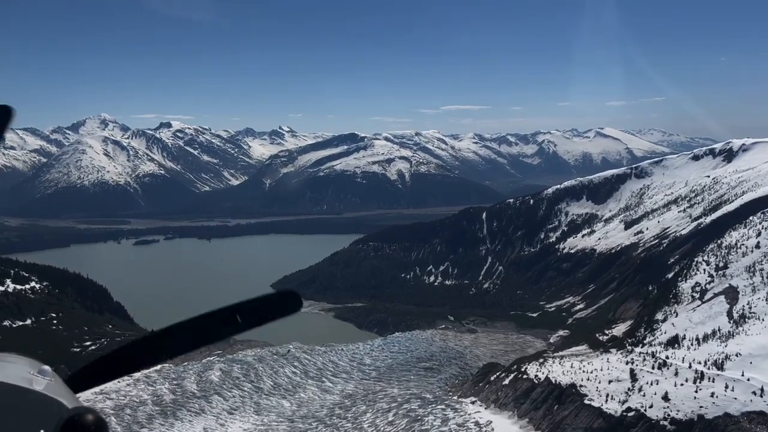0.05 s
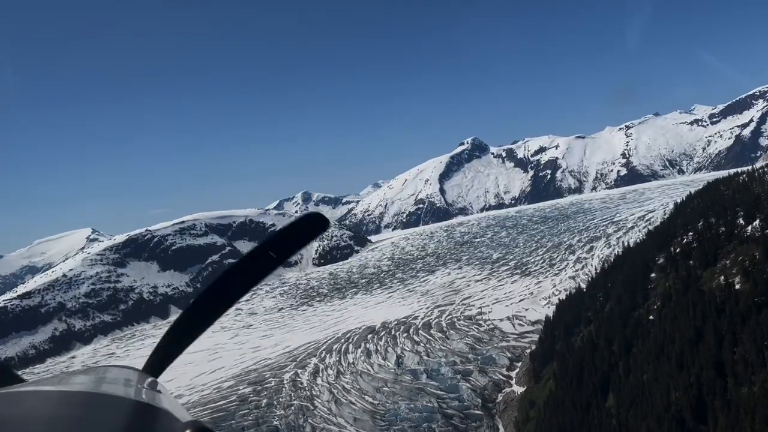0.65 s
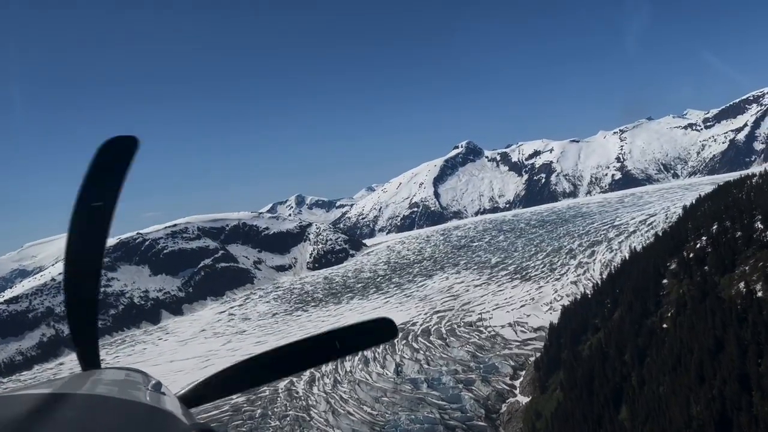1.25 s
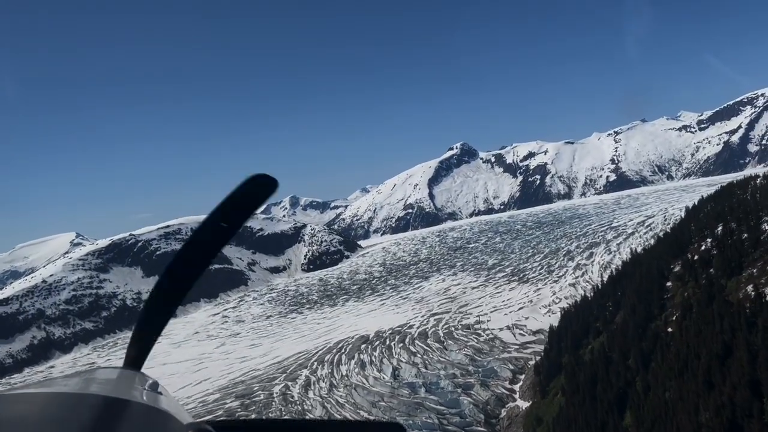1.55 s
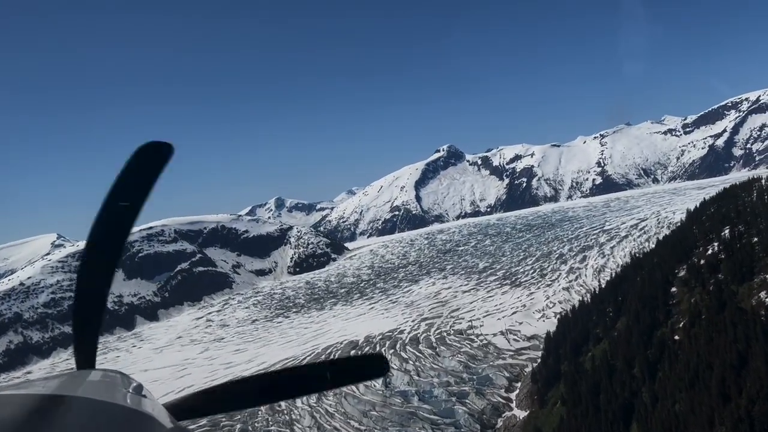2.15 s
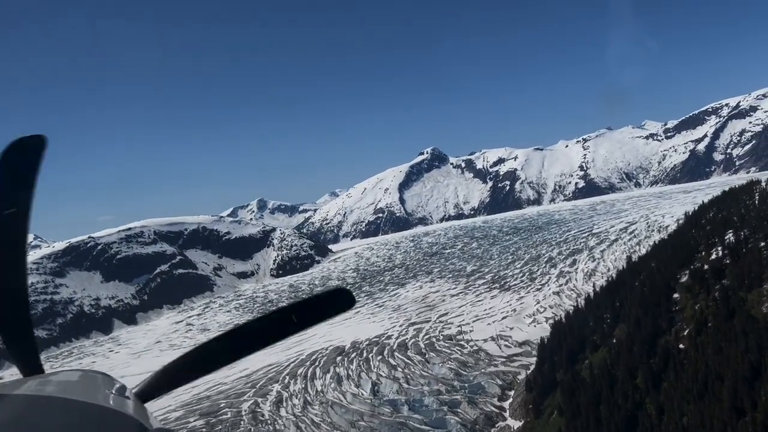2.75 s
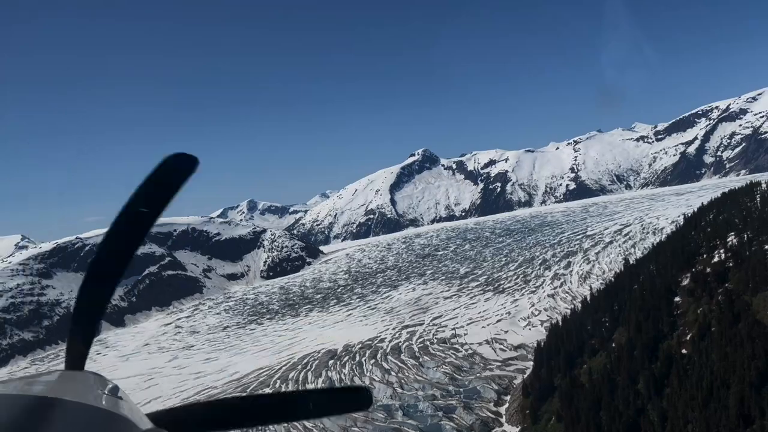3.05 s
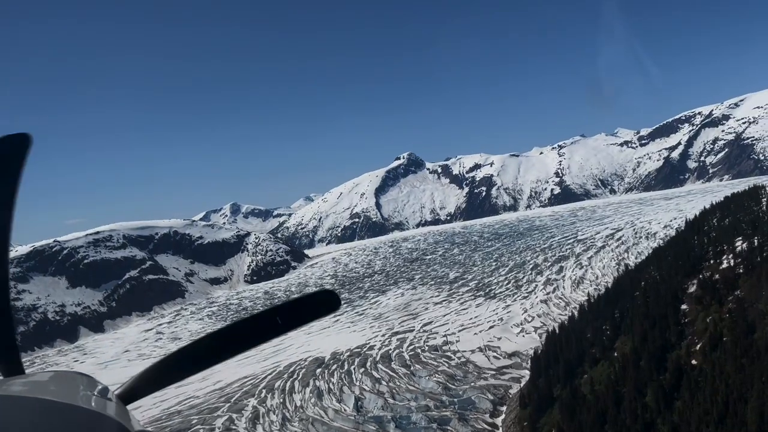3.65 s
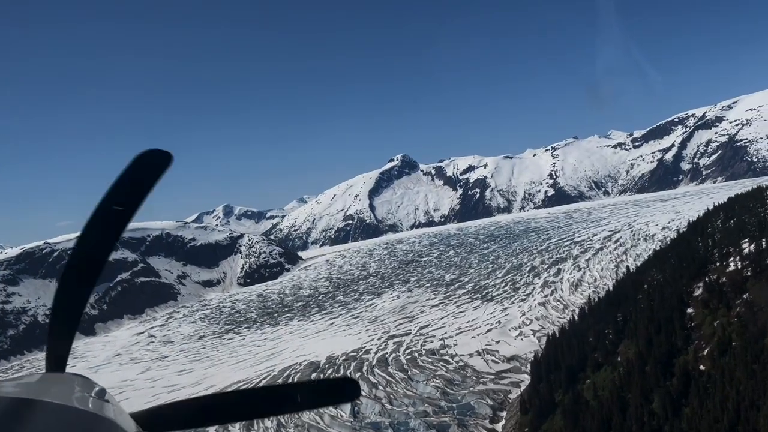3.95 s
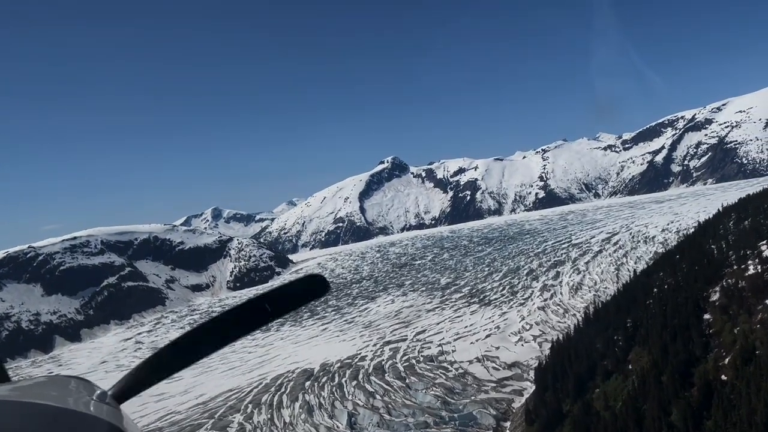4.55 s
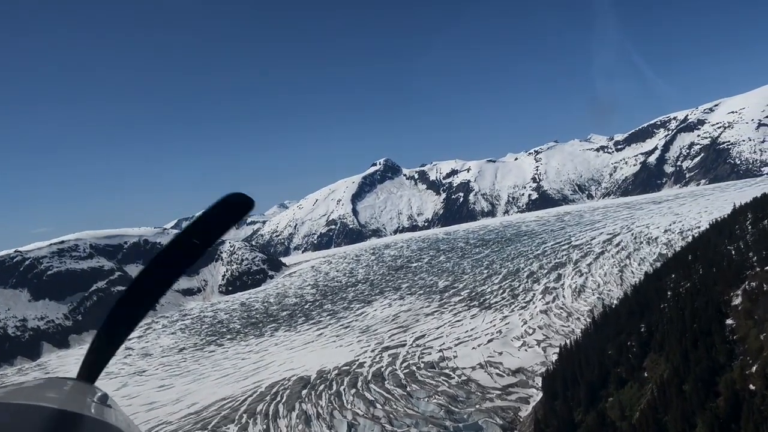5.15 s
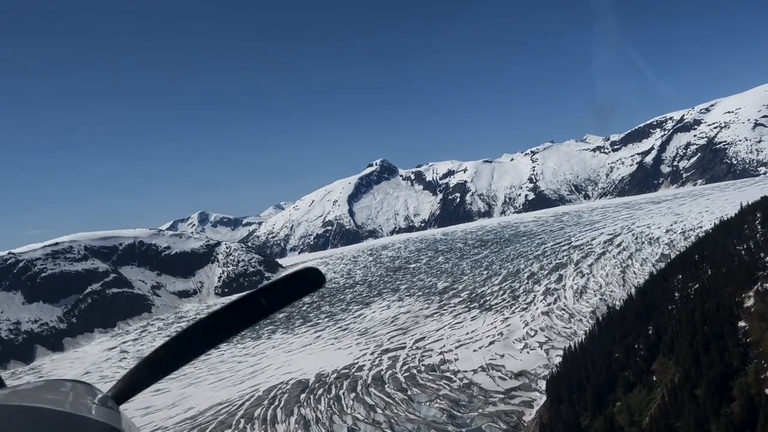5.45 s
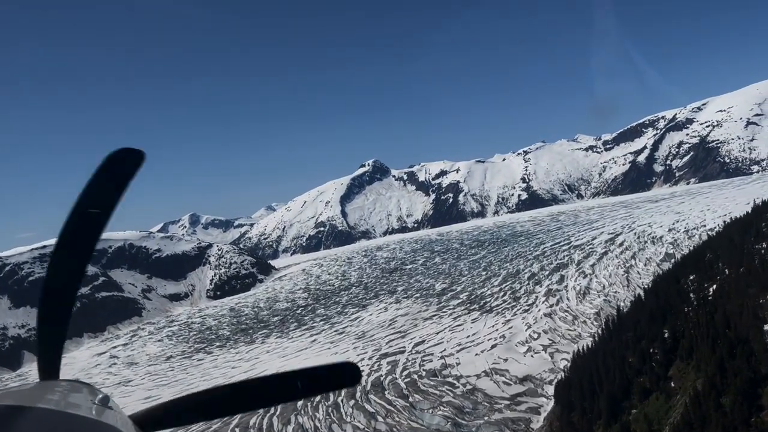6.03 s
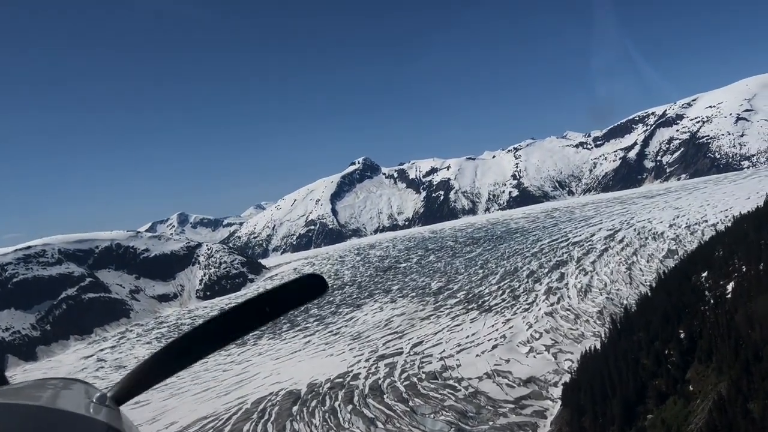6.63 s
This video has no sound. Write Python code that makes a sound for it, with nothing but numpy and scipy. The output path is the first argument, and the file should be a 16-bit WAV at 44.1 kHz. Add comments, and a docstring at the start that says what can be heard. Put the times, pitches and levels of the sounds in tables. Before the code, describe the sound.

Inside the cabin of a small propeller plane in level flight, air roars against the fuselage over a low propeller drone, steady gear tones and a thin turbine whine. The sound starts quietly, breaks off for an instant and swells back much louder. It then slowly dulls and fades, the hiss first and the low air last, until soft single buffets stand out. The stereo microphones are surrounded by it.

```python
"""Turboprop cabin in level flight

A stereo pair of microphones inside a small plane. Air beats on the fuselage all around in a lumpy roar and
rings the cabin's resonances; through it come the propeller's drone, gear tones and a thin turbine whine.
After a quiet start the sound breaks off and swells back much louder; then it slowly dulls and fades,
the hiss first and the low air last, until single buffets stand out."""
import sys
import numpy as np
from scipy import signal
from scipy.fft import rfft, irfft, next_fast_len
from scipy.io import wavfile
from scipy.ndimage import uniform_filter1d

SR = 44100
rng = np.random.default_rng(int(sys.argv[2]) if len(sys.argv) > 2 else 0)


def dump_mix(stems):
    """Bounce the given channels to the path in sys.argv[1] as a 16-bit WAV at rate SR."""
    frames = np.atleast_2d(stems).T  # one column per channel
    limited = np.clip(frames, -1, 1)  # hard clip at full scale
    pcm = np.round(limited * 32767).astype(np.int16)
    wavfile.write(sys.argv[1], SR, pcm)


N = 299439
TIME = np.arange(N) / SR
FFT_SIZE = next_fast_len(N, True)
HZ = np.maximum(np.fft.rfftfreq(FFT_SIZE, 1 / SR), 1)

# the cabin's sound field at the microphones: frequency_hz, likeness (0-1), left_lead_rad, balance_db (L-R)
CABIN_FIELD = [(60, 0.97, -0.1, 0.5), (300, 0.93, -0.4, -0.7), (520, 0.78, -0.6, -2.9),
               (700, 0.35, -2.2, -1.4), (820, 0.21, -3.2, -0.8), (1100, 0.13, -5.2, -4.7),
               (1500, 0.65, -3.2, -3.6), (2100, 0.29, -0.4, -3.7), (2700, 0.32, 1.1, -3.2),
               (3300, 0.32, 2.8, -0.5), (3750, 0.33, 0.4, -0.6), (4800, 0.39, 0.8, 1.4),
               (5700, 0.2, -1.9, -3.8), (6700, 0.71, -0.1, -1.8), (8400, 0.51, -1.2, 0.0),
               (11500, 0.8, 1.9, -0.0), (13000, 0.9, 0.1, -0.1)]
# each layer's course, by name: quiet_db, full_db, swell_s, hold_until_s, first_fade_db_per_s, settle_s
ENVELOPES = {"hiss": (-68.8, -50.9, .014, 1.45, 9.8, 1.53), "turbine": (-74, -52.3, .014, 1.55, 11.3, 1.84),
             "whine": (-81, -50.2, .014, 1.6, 11.5, 1.8), "draught": (-62, -48, .015, 2.25, 6.1, 2.8),
             "slipstream": (-53.8, -38.1, .017, 2.8, 5.6, 4), "whistle": (-74, -55.2, .017, 3.15, 9, 1.95),
             "howl": (-49.2, -33.4, .02, 4.9, 6.3, 9), "gears": (-56, -33, .025, 4.55, 5.1, 9),
             "moan": (-45.8, -31, .021, 5.1, 5, 9), "boom": (-44.4, -26.8, .018, 4.65, 6.9, 9),
             "roar": (-42.4, -24.1, .018, 4.15, 6.6, 8), "drone": (-61, -29.3, .023, 4, 7.4, 6)}

# spectra of the hiss below and above a gap near 10 kHz, the slipstream and roar: frequency_hz, relative_db
LOWER_HISS_SPECTRUM = [(3600, -21), (4400, 4.5), (5000, 2), (5600, -1.5), (6100, 3), (7000, 0.5),
                       (8200, 0.9), (9000, -7), (10000, -44)]
UPPER_HISS_SPECTRUM = [(10500, -53), (11200, 3), (11800, 3), (12600, 2.5), (13300, 1), (14000, 0),
                       (15000, -5), (16500, -35.5)]
SLIPSTREAM_SPECTRUM = [(820, -12), (920, 5.5), (1020, -1.5), (1200, -3.8), (1500, -6.4), (1800, -10.5),
                       (2100, -10.5), (2650, -19), (3100, -19), (4400, -28.5), (5200, -28.5), (6200, -49.5)]
ROAR_SPECTRUM = [(20, -50), (38, -49), (52, -22.5), (70, -15.8), (88, -7.6), (135, -1), (170, -3.8),
                 (222, -.3), (260, -1.6), (320, -9), (420, -34)]
# resonances of the window panels, a draught and its whistle: pitch_hz, half_width_hz, relative_db
PANEL_MODES = [(1080, 24, 0), (1427, 33, -4), (1610, 45, -5.5), (1740, 29, -8.5)]
DRAUGHT_MODES = [(2430, 210, 0), (2720, 200, 0.5), (3330, 360, -5.5), (3820, 380, -7.5), (4370, 200, -8.5)]
WHISTLE_MODES = [(3760, 190, 1), (4000, 130, -2), (4180, 150, -6)]
# resonances of the cabin's air, low to high: pitch_hz, half_width_hz, relative_db
BOOM_MODES = [(308.4, 48, -1), (338.6, 44, -1.5), (393, 31, -4), (438, 39, -6)]
MOAN_MODES = [(475, 38, -7.5), (517, 46, -1.3), (556, 24, -8.5), (605, 40, -9.5)]
HOWL_MODES = [(625, 42, -3.5), (692.6, 24, 0.5), (738, 24, 0), (785, 30, -10), (833, 39, -4),
              (872, 40, -9.5)]

# brief rushes in the slipstream, and gusts and lulls in the low air: centre_s, swell_db, half_length_s
RUSHES = [(3.59, 2.5, .06), (4.65, 1.5, .04)]
GUSTS = [(1.12, 1.2, .06), (1.26, -1.5, .06), (1.97, 1, .06), (2.6, -1.2, .12), (3.79, -3, .03),
         (4.14, 1.7, .06), (4.29, -1.7, .05), (4.4, 1.5, .035), (4.5, -3.5, .05), (4.8, -1.3, .14),
         (5.0, -1.8, .07), (5.18, -2, .04), (5.3, 2.2, .08), (5.412, -4, .018), (5.525, -4, .035),
         (5.76, 2.5, .08), (5.925, -3, .025), (6.05, -4, .05), (6.16, 2, .035), (6.39, 3.5, .025),
         (6.53, -2, .06)]
# throbs of a low cabin resonance: centre_s, level_db, half_length_s
THROBS = [(1.03, -30, .1), (1.68, -27, .13), (2.07, -29, .07), (3.42, -26.5, .17), (4.1, -23.5, .12)]
# single buffets on the fuselage: centre_s, level_db, pitch_hz, half_length_s
BUFFETS = [(1.056, -13, 300, .003), (1.082, -15, 260, .002), (1.598, -13, 300, .002),
           (1.607, -15, 170, .006), (1.614, -14, 280, .002), (3.360, -14, 290, .003),
           (3.915, -15, 240, .003), (4.030, -14, 290, .002), (4.167, -12, 210, .007),
           (4.379, -14.5, 286, .002), (4.396, -12, 275, .003), (4.583, -11.5, 235, .0035),
           (4.757, -19, 170, .006), (4.882, -16, 350, .002), (4.968, -18.5, 220, .006),
           (5.040, -19, 400, .0015), (5.066, -17, 320, .002), (5.078, -16, 300, .002),
           (5.138, -17, 340, .002), (5.235, -13, 300, .0025), (5.303, -13, 326, .0013),
           (5.333, -17, 415, .0017), (5.364, -14.5, 275, .0035), (5.404, -21, 170, .004),
           (5.45, -21, 300, .006), (5.467, -15, 325, .0024), (5.571, -12, 300, .002),
           (5.707, -18, 350, .002), (5.738, -18, 340, .004), (5.808, -20, 220, .003),
           (5.823, -17.5, 415, .0016), (5.893, -20, 320, .0016), (5.968, -18, 350, .0045),
           (6.120, -24, 275, .004), (6.150, -19.5, 280, .004), (6.184, -19.5, 330, .0026),
           (6.279, -21, 320, .005), (6.377, -20, 445, .0015), (6.395, -16.5, 325, .003),
           (6.402, -24, 500, .005), (6.633, -24, 410, .0017)]

# compressor tones: pitch_hz, relative_db
WHINE_TONES = [(11377, -15), (11478, -16), (11586, -20.5), (11683, -23), (12702, -21), (13721, -17),
               (13820, -17)]
# the engine sags slightly and picks up again: time_s, share_of_usual_speed
ENGINE_SPEED = [(.4, 1), (1.1, .9987), (2.5, .9992), (3.6, 1.0012), (6.7, 1.0004)]
# gearbox tones: pitch_hz, relative_db, left_lead_rad, balance_db, flutter_db, sink_db_per_s
GEAR_TONES = [(374, -10.5, -.4, -2, 2.5, 0), (521, -8.5, -.6, -3, 3.2, 0), (670, 0, .19, -4.4, .8, 0),
              (874.3, -8.6, 0, -3.7, 2, .9)]
# tones of the four-bladed propeller: multiple_of_shaft_rate, relative_db
PROPELLER_ORDERS = [(4, -1), (5, -13.5), (6, -8), (7, -25), (8, -10), (9, -15.5), (11, -13.5)]


def from_db(db):
    """Decibels to gain."""
    return 10 ** (np.asarray(db) / 20)


def unit_mid(pair):
    """Scale a stereo pair so that its middle has rms 1."""
    return pair / np.std(pair.mean(0))


def at_hz(rows, hz):
    """Each column of a table at these frequencies."""
    points, *columns = np.transpose(rows)
    return [np.interp(np.log(hz), np.log(points), column) for column in columns]


def bump(centre_s, half_s):
    """A smooth rise to 1 and back."""
    return np.exp(-np.minimum(((TIME - centre_s) / half_s) ** 2, 30))


def swells_db(rows):
    """How far the air swells and slackens."""
    return sum(db * bump(centre_s, half_s) for centre_s, db, half_s in rows)


def drift(rate_hz):
    """A smooth random curve that changes about rate_hz times a second; spread 1."""
    slow = irfft(rfft(rng.standard_normal(FFT_SIZE)) / (1 + (HZ / rate_hz) ** 4), FFT_SIZE)[:N]
    return slow / np.std(slow)


def faded_db(layer):
    """How far a layer has sunk from its full level: not at all while it holds, then fast, then settling."""
    *_, hold_until_s, db_per_s, settle_s = ENVELOPES[layer]
    fading_s = np.maximum(TIME - hold_until_s, 0)
    return db_per_s * settle_s * (1 - np.exp(-fading_s / settle_s))


def level(layer, break_s=.353, return_s=.361, depth_db=34):
    """Gain of a layer: quiet start, break, quick swell, hold and fade."""
    quiet_db, full_db, swell_s, *_ = ENVELOPES[layer]
    dip_db = depth_db * np.exp(-np.maximum(TIME - return_s, 0) / swell_s)
    course_db = np.where(TIME < break_s, quiet_db, full_db - dip_db - faded_db(layer))
    return from_db(uniform_filter1d(course_db, 128))


def outline(spectrum):
    """Gain per frequency of a spectrum, silent beyond its ends."""
    return from_db(at_hz(spectrum, HZ)[0]) * (HZ > spectrum[0][0]) * (HZ < spectrum[-1][0])


def resonances(modes):
    """Gain per frequency of steep-sided resonances that add in power."""
    return np.sqrt(sum(from_db(db) ** 2 / (1 + ((HZ - hz) / width) ** 2) ** 2 for hz, width, db in modes))


def turbulence(colour):
    """Coloured noise: alike at both microphones in the bass, more diffuse higher up."""
    likeness, lead, balance_db = at_hz(CABIN_FIELD, HZ)
    likeness = np.clip(likeness, 0, .995)
    left, unrelated = rfft(rng.standard_normal((2, FFT_SIZE)))
    right = likeness * np.exp(-1j * lead) * left + np.sqrt(1 - likeness ** 2) * unrelated
    pair = np.array([left * from_db(balance_db / 2), right * from_db(-balance_db / 2)])
    return unit_mid(irfft(pair * colour, FFT_SIZE)[:, :N])


def swirl(sound, spread_db, skew=0, size=1024):
    """Narrow bands swell and sink at random for hundredths of a second; with skew, a few flare up."""
    _, frame_s, patches = signal.stft(sound, SR, nperseg=size)
    chance = rng.standard_normal(patches.shape[1:])
    chance = uniform_filter1d(chance, size=3, axis=0)   # across frequency
    chance = uniform_filter1d(chance, size=5, axis=1)   # across time
    chance = np.clip(chance / chance.std(), -3, 3)
    frame_spread_db = np.interp(frame_s, TIME, spread_db * np.ones(N))
    gain = from_db(frame_spread_db * (chance + skew * chance ** 2))
    mean_power = uniform_filter1d(np.mean(gain ** 2, axis=0), size=15)
    gain = gain / np.sqrt(mean_power)
    return signal.istft(patches * gain, SR, nperseg=size)[1][:, :N]


def wandering_clock(wander, rate_hz, speed=1):
    """Time that runs slightly fast and slow, as a governed shaft does; wander is a share of the speed."""
    return np.cumsum(speed + wander * drift(rate_hz)) / SR


def tone(hz, clock, lead_rad, balance_db, flutter_db, flutter_hz):
    """A fluttering sine that follows a clock, with its own phase and level at each microphone."""
    sides = np.array([[.5], [-.5]])
    phase = 2 * np.pi * (hz * clock + rng.random()) + lead_rad * sides
    gain = from_db(balance_db * sides + flutter_db * drift(flutter_hz))
    return unit_mid(np.sin(phase) * gain)


def upper_hiss():
    """The top of the hiss, above a gap near 10 kHz."""
    return level("turbine") * turbulence(outline(UPPER_HISS_SPECTRUM)) * from_db(.98 * drift(24))


def turbine_whine():
    """Two clusters of compressor tones, spaced by the propeller's blade rate, and a lone tone between."""
    clock = wandering_clock(wander=.0005, rate_hz=12)
    whine = 0
    for hz, db in WHINE_TONES:
        _, lead_rad, balance_db = at_hz(CABIN_FIELD, hz)
        whine += from_db(db) * tone(hz, clock, lead_rad, balance_db, flutter_db=1.5, flutter_hz=16)
    return whine


def treble():
    """Faint high hiss and whine; brief random patches of treble flicker as they fade."""
    lower_hiss = level("hiss") * from_db(.9 * drift(20)) * turbulence(outline(LOWER_HISS_SPECTRUM))
    highs = lower_hiss + upper_hiss() + level("whine") * turbine_whine()
    flicker_db = 3.4 * bump(centre_s=2.65, half_s=1.0)
    return swirl(highs, flicker_db, skew=.09, size=512)


def high_air():
    """The slipstream just outside the window panels, and a draught with a breathy whistle in it."""
    panels = np.hypot(outline(SLIPSTREAM_SPECTRUM), resonances(PANEL_MODES))
    rush_db = .54 * drift(15) + swells_db(RUSHES)
    slipstream = level("slipstream") * from_db(rush_db) * turbulence(panels)
    draught = level("draught") * turbulence(resonances(DRAUGHT_MODES))
    whistle = level("whistle") * turbulence(resonances(WHISTLE_MODES))
    return swirl(slipstream + draught + whistle, spread_db=2.1)


def throbs(pitch_hz=216):
    """The cabin's strongest low resonance builds up now and then into a wavering, hollow note."""
    clock = wandering_clock(wander=.02, rate_hz=9)
    swell = sum(from_db(db) * bump(centre_s, half_s) for centre_s, db, half_s in THROBS)
    return swell * tone(pitch_hz, clock, lead_rad=-.35, balance_db=-.4, flutter_db=2, flutter_hz=14)


def buffets():
    """A strong eddy sweeps over a panel: the pressure swings softly in and out, a cycle or a few."""
    pressure = np.zeros(N)
    for centre_s, db, hz, half_s in BUFFETS:
        swing = np.sin(2 * np.pi * (hz * (TIME - centre_s) + rng.random()))
        pressure += from_db(db) * bump(centre_s, half_s) * swing
    return pressure * from_db([[-1.2], [1.2]])   # a little louder at the right microphone


def lumps(spread_db):
    """Eddies beat on the skin in lumps of a few hundredths of a second; a gain of mean power 1."""
    return from_db(spread_db * drift(26) - spread_db ** 2 * np.log(10) / 20)


def low_air():
    """All around the microphones, the fuselage's roar and the cabin's boom, moan and howl ride on gusts."""
    roar = level("roar") * turbulence(outline(ROAR_SPECTRUM))
    boom = level("boom") * turbulence(resonances(BOOM_MODES))
    howl = level("howl") * from_db(1.2 * drift(19)) * turbulence(resonances(HOWL_MODES))
    moan = level("moan") * turbulence(resonances(MOAN_MODES))
    lump_db = .7 + .09 * faded_db("roar")   # lumpier as the roar fades
    rumble = (roar + boom + moan) * lumps(lump_db)
    gust_db = swells_db(GUSTS)
    return rumble * from_db(gust_db) + howl * from_db(.5 * gust_db)


def gears():
    """Gearbox tones follow the engine's speed: one steady, the weaker wavering; the highest fades first."""
    clock = wandering_clock(wander=.0002, rate_hz=2.8, speed=np.interp(TIME, *np.transpose(ENGINE_SPEED)))
    singing_db = 2.4 * bump(centre_s=1.02, half_s=.33)   # they sing out for a moment
    gearbox = 0
    for hz, db, lead_rad, balance_db, flutter_db, sink_db_per_s in GEAR_TONES:
        gain = from_db(db + singing_db - sink_db_per_s * TIME)
        gearbox += gain * tone(hz, clock, lead_rad, balance_db, flutter_db, flutter_hz=8)
    return gearbox


def propeller(shaft_hz=25.53):
    """Blade passage at four times the shaft rate, and weaker orders above; all waver in uneven inflow."""
    clock = wandering_clock(wander=.0045, rate_hz=5)
    drone = 0
    for order, db in PROPELLER_ORDERS:
        partial = tone(order * shaft_hz, clock, lead_rad=-.31, balance_db=.6, flutter_db=3, flutter_hz=7)
        drone += from_db(db) * partial
    return drone


def scene():
    """The engine's tones and the noise of the air fill the cabin around the microphones."""
    engine = level("drone") * propeller() + level("gears") * gears()
    return engine + low_air() + throbs() + buffets() + high_air() + treble()


def record(dry, cutoff_hz=15600, fade_s=.003):
    """The top is cut steeply; the sound ends without a click."""
    ending = np.clip((TIME[-1] - TIME) / fade_s, 0, 1)
    lowpass = signal.ellip(10, .2, 90, cutoff_hz, fs=SR, output="sos")
    return signal.sosfilt(lowpass, dry * ending)


dry = scene()
out = record(dry)
dump_mix(out)
```